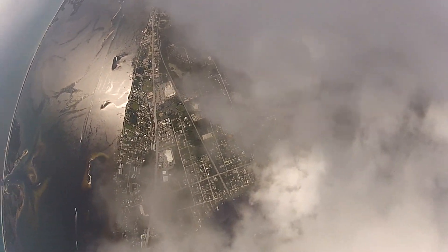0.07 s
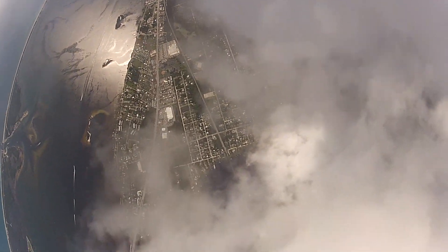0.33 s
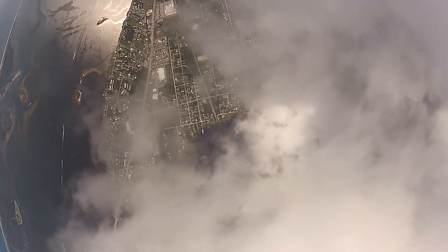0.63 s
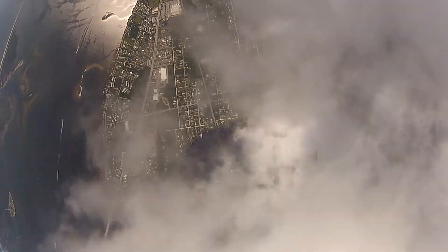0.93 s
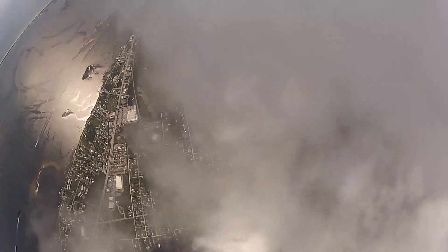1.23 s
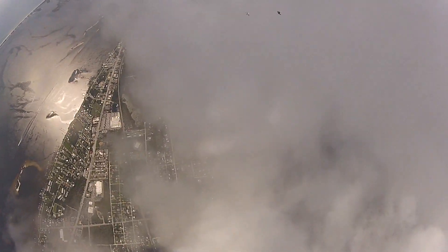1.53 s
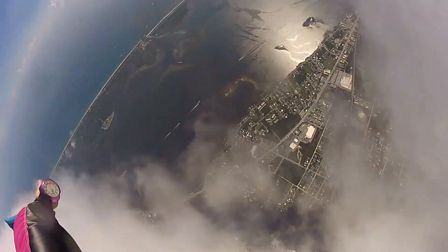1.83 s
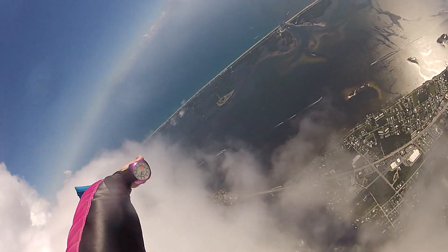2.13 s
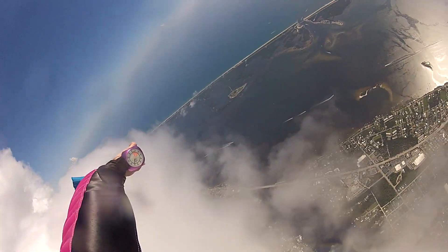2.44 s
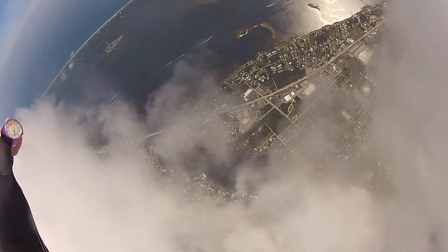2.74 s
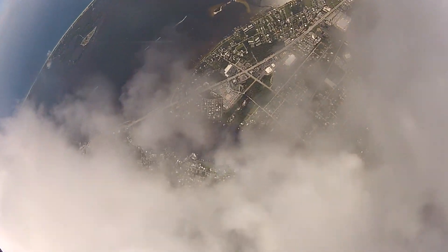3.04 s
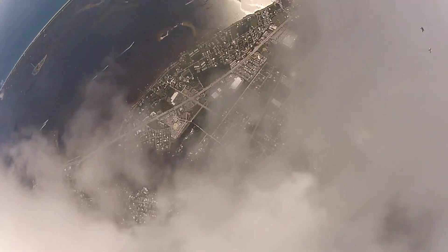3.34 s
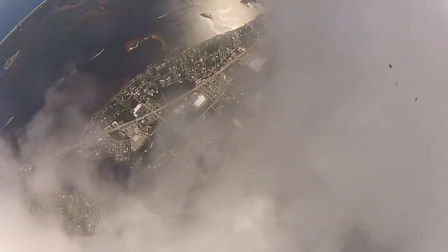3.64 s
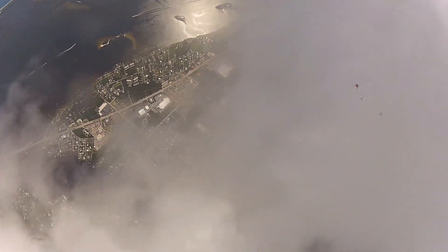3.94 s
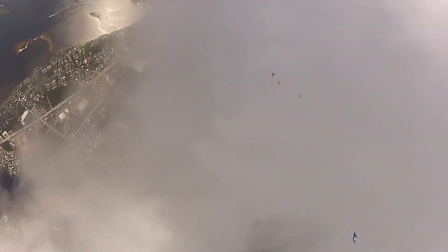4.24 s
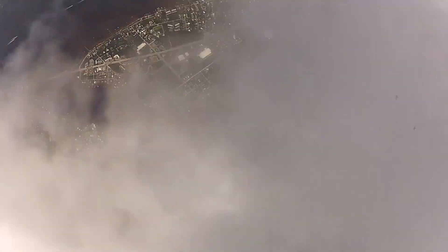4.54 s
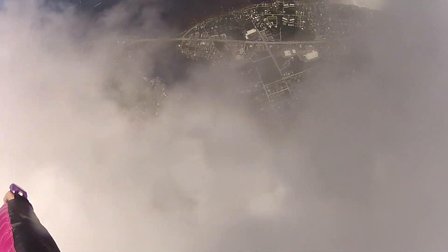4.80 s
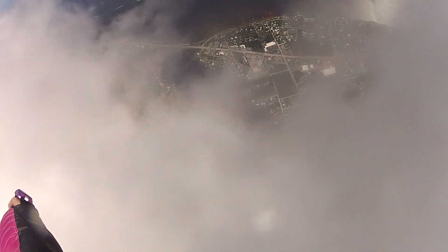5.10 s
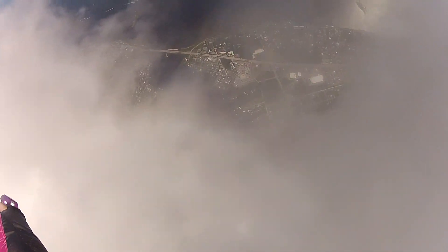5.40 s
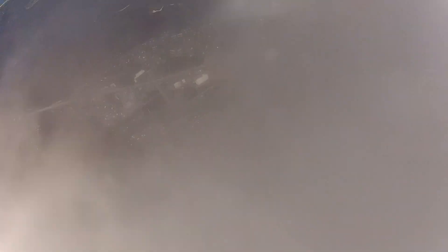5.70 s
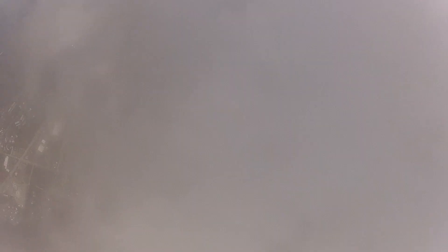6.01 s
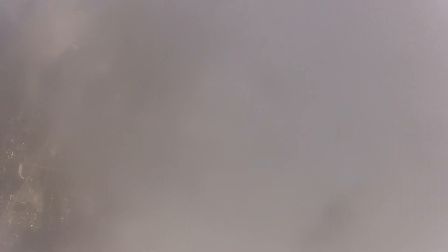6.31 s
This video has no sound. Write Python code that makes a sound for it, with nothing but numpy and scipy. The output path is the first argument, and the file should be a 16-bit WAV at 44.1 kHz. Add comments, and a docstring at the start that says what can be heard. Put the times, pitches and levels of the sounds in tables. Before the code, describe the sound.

High in the sky, loud wind beats directly on a wingsuit flyer's microphone, rumbling and thumping beneath a hollow, hissing rush that never stops. A narrow gap whistles twice in the first two seconds, while rough moans and short howls peel off the helmet throughout. In the last moments, cloud mist adds a thicker hiss over the roar.

```python
"""Rushing air roars through the hollows of a helmet and camera housing on a wingsuit flight.
Swirls of air thud and rumble on the camera's microphone, and slits in the housing hiss.
Vortices (little whirls of air) moan and howl as they peel off the helmet, and early on a
narrow gap whistles twice. Near the end the flyer enters a cloud, and mist swells the hiss."""
import sys
import numpy as np
from scipy import signal
from scipy.fft import rfft, irfft, next_fast_len
from scipy.io import wavfile
from scipy.ndimage import uniform_filter1d, map_coordinates

SR = 44100
rng = np.random.default_rng(int(sys.argv[2]) if len(sys.argv) > 2 else 0)


def to_wav(sig):
    """Store sig (one row per channel, or 1-D mono) as 16-bit WAV at the path in sys.argv[1].

    Samples outside -1..1 are clipped; the rate is SR.
    """
    pcm = np.clip(np.atleast_2d(sig), -1, 1) * 32767
    pcm = np.round(pcm).astype(np.int16)
    wavfile.write(sys.argv[1], SR, pcm.T)  # frames by channels


N = 284886
TIME = np.arange(N) / SR


def amp(db):
    """Turn decibels (dB) into a number to multiply by."""
    return 10 ** (np.asarray(db) / 20)


def unit(x):
    """Scale x to an average strength (rms) of 1."""
    return x / np.sqrt(np.mean(x ** 2) + 1e-20)


def curves(rows):
    """Join timed rows with straight lines: one curve for each column after the time."""
    times, *columns = np.transpose(rows)
    return [np.interp(TIME, times, column) for column in columns]


def ramp(start_s, length_s):
    """Rise from 0 to 1 over length_s."""
    return np.clip((TIME - start_s) / length_s, 0, 1)


def bumps(rows, half_s):
    """A smooth bump for each row of time and height."""
    return sum(height * np.cos(np.pi / 2 * np.clip((TIME - s) / half_s, -1, 1)) ** 2
               for s, height in rows)


def wobble(rate, size=N):
    """A smooth curve through `rate` random values a second."""
    return unit(map_coordinates(rng.standard_normal(4096), [np.arange(size) * rate / SR], mode="wrap"))


def filtered(x, response):
    """Turn each frequency in x up or down as `response` says."""
    size = next_fast_len(N + 8192)
    return irfft(rfft(x, size) * response(np.fft.rfftfreq(size, 1 / SR)), size)[:N]


def colour(points):
    """A filter shape drawn through points of frequency and level."""
    point_hz, db = np.transpose(points)
    return lambda hz: amp(np.interp(np.log(hz + 1), np.log(point_hz + 1), db))


def resonant(peaks):
    """A filter shape with a steep peak at each ringing pitch."""
    return lambda hz: np.sqrt(sum(amp(db) ** 2 / (1 + ((hz - centre) / width) ** 2) ** 3
                                  for centre, width, db in peaks))


def rush(response, patchy_db):
    """Churning air: filtered noise in which patches of time and pitch swell and fade."""
    spectrum = signal.stft(rng.standard_normal(N), nperseg=512)[2]
    patches = uniform_filter1d(rng.standard_normal(spectrum.shape), size=6, axis=0)  # blur in pitch
    patches = uniform_filter1d(patches, size=12, axis=1)  # blur in time
    noise = signal.istft(spectrum * amp(patchy_db * unit(patches)), nperseg=512)[1][:N]
    return unit(filtered(noise, response))


# How hard the air blows across each hollow as the head turns.
# Each row: time in seconds, then relative level in dB for the large, middle and small hollow.
BLOWING = [(0.0, -29.5, -30.0, -21.5), (0.35, -25.5, -31, -24.0), (0.82, -24, -30.0, -24.5),
           (1.13, -25.5, -27.5, -20.5), (1.35, -29.5, -32.5, -21.5), (1.58, -28.5, -32.5, -21.0),
           (1.75, -27.5, -27.5, -22.0), (2.15, -33.5, -27.5, -23), (2.6, -30.5, -26.5, -22.0),
           (2.95, -26.5, -25.5, -25.5), (3.3, -25.5, -25.5, -23), (3.8, -32, -25.5, -21.0),
           (4.1, -30, -30, -21), (4.4, -28, -27, -22.5), (5.1, -30.0, -27.0, -22.0),
           (5.68, -27, -26.5, -22), (5.92, -26, -32, -22.5), (6.46, -26, -31, -24.5)]
# How each hollow rings. Each row: pitch in Hz, width in Hz, relative level in dB.
LARGE_HOLLOW = [(941.6, 119.7, -4.5), (1173.7, 169, 0)]
MIDDLE_HOLLOW = [(1387, 135, -1.1), (1641, 170, 0.93), (1873, 455, -2.33)]
SMALL_HOLLOW = [(1948.4, 169, -1.5), (2316.6, 265, -2), (2460.4, 270, -4.5), (2674, 271, -6)]

def hollows():
    """Each hollow rings as churning air crosses its mouth, like a bottle you blow over."""
    large_db, middle_db, small_db = curves(BLOWING)
    large = amp(large_db + 0.5) * rush(resonant(LARGE_HOLLOW), patchy_db=0.9272)
    middle = amp(middle_db + 1.3651) * rush(resonant(MIDDLE_HOLLOW), patchy_db=0.9272)
    small = amp(small_db - 0.0852) * rush(resonant(SMALL_HOLLOW), patchy_db=0.9272)
    return large + middle + small


# Air beating on the microphone. Each row: time in seconds, relative thud and rumble levels in dB.
BUFFET_LEVELS = [(0.0, -31.0, -32.5), (0.45, -37, -37), (1.2, -33, -35.0), (1.75, -32.0, -34.5),
                 (2.0, -32.5, -36.0), (2.7, -34.5, -36.5), (3.2, -33, -33), (3.6, -32.5, -35.0),
                 (4.1, -32.5, -36.5), (4.35, -29.5, -32.5), (5.1, -33.5, -35), (5.9, -29, -31.5),
                 (6.46, -30, -30)]
# Single big swirls that thump it. Each row: time in seconds, extra thud in dB.
BIG_SWIRLS = [(.72, 6.5), (1.04, 5.5), (1.88, 4), (2.91, 5), (3.42, 2.5), (4.63, 3.5), (6.15, 4)]
# The tone of the thud and of the rumble. Each row: frequency in Hz, relative level in dB.
THUD_TONE = [(15, -23.5), (30, -13.5), (60, -4), (95, 2.5), (125, -2), (170, -13), (300, -19), (800, -66)]
RUMBLE_TONE = [(60, -15), (140, -2.5), (215, 1.5), (300, -3), (450, -6.5), (650, -10.5), (850, -11.5),
               (1500, -46), (4000, -54.5)]

def buffeting():
    """Swirls of air push on the microphone: big ones thud, small ones rumble."""
    thud_db, rumble_db = curves(BUFFET_LEVELS)
    thump_db = bumps(BIG_SWIRLS, half_s=0.113)
    thud = amp(thud_db + thump_db + 0.5) * rush(colour(THUD_TONE), patchy_db=0.5)
    rumble = amp(rumble_db + 3) * rush(colour(RUMBLE_TONE), patchy_db=0.5)
    return thud + rumble


# Air skimming the slits at the housing's edges. Each row: time in seconds, relative level in dB.
HISS_LEVELS = [(0, -30.5), (.75, -30), (.9, -31.5), (1.1, -29.5), (1.75, -32), (2.3, -31), (2.8, -33),
               (3.6, -32.5), (4.9, -32), (5.7, -31.5)]
# How the slits ring. Each row: pitch in Hz, width in Hz, relative level in dB.
SLIT_PEAKS = [(3126, 229, 0.5), (3634, 385, 2.5), (4721, 680, -2.5), (5105, 430, -3.5), (6961, 550, -4.5),
              (7337, 853, -10), (8330, 265, -5), (8725, 655, -9)]
# The tone of the fizz. Each row: frequency in Hz, relative level in dB.
FIZZ_TONE = [(3000, -17), (8900, -11), (9200, 0), (9550, 6), (9850, 2), (10050, 3.5), (10450, -4),
             (10850, -2.5), (13050, -16.5), (13450, -2.5), (13950, 1.5), (14450, -1.5), (14850, -0.5),
             (15300, -21.5)]

def hiss():
    """Air sets the slits hissing in quick spurts; a finer fizz comes off the housing's surface."""
    hiss_db, = curves(HISS_LEVELS)
    slits = amp(hiss_db + 3 + 0.25 * wobble(220)) * rush(resonant(SLIT_PEAKS), patchy_db=0.8461)
    # The surface lies in the same airflow as the small hollow, so the fizz partly follows it.
    small_db = curves(BLOWING)[-1]
    fizz_db = -30.5 + 0.45 * (small_db - small_db.mean())
    fizz = amp(fizz_db + 0.56 * wobble(70)) * rush(colour(FIZZ_TONE), patchy_db=0.5)
    return slits + fizz


# The airflow lets go of the housing for an instant. Each row: time in seconds, dip in dB.
AIR_LULLS = [(1.325, 2), (1.83, 2.5), (4.035, 4), (4.11, 3), (4.63, 3), (5.76, 2.5)]

def gusts():
    """A loudness curve that shakes with quick gusts and dips at each lull."""
    return amp(0.321 * wobble(35) + 0.557 * wobble(250) - bumps(AIR_LULLS, half_s=0.0424))


def flutter(centre_hz, width_hz):
    """A rough tone whose pitch and strength wander; more width makes it rougher."""
    size = len(centre_hz)
    pitch_hz = centre_hz + width_hz / 2 * wobble(2 * width_hz, size)
    phase = 2 * np.pi * np.cumsum(pitch_hz) / SR
    strength = amp(2.82 * wobble(width_hz, size))
    return unit(strength * np.sin(phase))


# Low moans and higher howls. Each row: middle time in seconds, half length in seconds,
# first pitch in Hz, last pitch in Hz, width in Hz, level at the middle in dB.
MOANS_AND_HOWLS = [(0.469, 0.324, 942.7, 948, 80.77, -33), (.81, 0.27, 949.3, 954, 54.88, -26),
                   (.94, 0.161, 160.6, 130.3, 24.86, -30.5), (1.2, 0.145, 215.5, 203.7, 30.1, -33),
                   (1.721, 0.078, 227, 245, 23.9, -30.5), (2.12, 0.223, 150.6, 129.3, 41.1, -27.5),
                   (2.49, 0.1535, 119.6, 145.8, 40.97, -28), (3.25, 0.1015, 1450, 1250, 140.3, -25),
                   (3.43, 0.12, 59.75, 99.4, 22.07, -30), (4.14, 0.324, 164.8, 240.3, 30.25, -30.5),
                   (4.381, 0.1982, 249.7, 185.2, 35, -26.5), (4.609, 0.062, 1250, 1082, 151.5, -24.5),
                   (5.624, .07, 1455, 1096, 120.2, -26)]

def vortices():
    """Whirls of air peel off the helmet in runs; the faster they come, the higher the pitch."""
    out = np.zeros(N + SR)
    for middle_s, half_s, first_hz, last_hz, width_hz, db in MOANS_AND_HOWLS:
        size = round(2 * half_s * SR)
        start = max(0, round((middle_s - half_s) * SR))
        tone = flutter(np.linspace(first_hz, last_hz, size), width_hz)
        out[start:start + size] += amp(db) * np.hanning(size) * tone
    return out[:N]


# The gap's two notes. Each row: pitch in Hz, relative level in dB.
GAP_NOTES = [(3694, 4), (8306, -4.5)]
# Each row: start in seconds, break-off in seconds, level at break-off in dB,
# share of clean tone from 0 (all breathy) to 1 (all clean).
GAP_WHISTLES = [(.3, 0.791, -28.5, 1), (1.85, 1.97, -33.5, .35)]

def whistle():
    """Air makes a narrow gap ring on two notes at once; each whistle swells, then breaks off."""
    swell_db, fade_s = 5.5, 0.059
    drift_hz = 3.5 * wobble(25)
    clean = unit(sum(amp(db) * np.sin(2 * np.pi * np.cumsum(hz + drift_hz) / SR)
                     for hz, db in GAP_NOTES))
    breathy = rush(resonant([(hz, 110, db) for hz, db in GAP_NOTES]), patchy_db=1)  # 110 Hz width
    out = np.zeros(N)
    for start, end, db, clean_share in GAP_WHISTLES:
        swell = amp(db - swell_db * (1 - ramp(start, end - start)))
        on_off = ramp(start, fade_s) - ramp(end, fade_s)
        out += on_off * swell * (np.sqrt(clean_share) * clean + np.sqrt(1 - clean_share) * breathy)
    return out


# How mist changes the tone of the slits. Each row: frequency in Hz, change in dB.
MIST_TONE = [(3000, -0.5), (4000, -2), (5000, 1), (7200, -0.5), (8500, -1.5), (9500, -6.5)]

def cloud():
    """Mist hits the slits too thickly to hear single drops: a hiss that swells, holds and thins."""
    thinning_db = 10 * np.maximum(TIME - 6.31, 0)  # 10 dB a second, from 6.31 seconds on
    level = ramp(start_s=5.76, length_s=0.122) * amp(-25.5 - thinning_db + 0.69 * wobble(120))
    misty_slits = lambda hz: resonant(SLIT_PEAKS)(hz) * colour(MIST_TONE)(hz)
    return level * rush(misty_slits, patchy_db=0.5)


def scene():
    """Add all the sounds into one channel; gusts shake the hollows, hiss and mist together."""
    gust = gusts()
    return (buffeting() + gust * (hollows() + hiss() + cloud()) + vortices() + whistle())[None]


# Two bands are missing from the treble: a narrow dip near 6 kHz and a wide, silent gap near 12 kHz.
# Each row: frequency in Hz, width in Hz, change in dB.
TREBLE_GAPS = [(6043, 145, -25), (11858, 663.4, -68)]

def record(dry):
    """Two bands drop out of the treble, and the camera loses the very highest sounds."""
    top_hz = 15400
    dips_db = lambda hz: sum(db * np.exp(-((hz - centre) / width) ** 4)
                             for centre, width, db in TREBLE_GAPS)
    return filtered(dry[0], lambda hz: amp(dips_db(hz)) * (hz < top_hz))[None]


dry = scene()
out = record(dry)
to_wav(out)
```